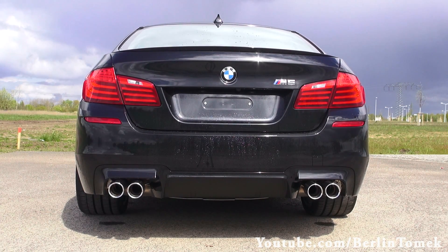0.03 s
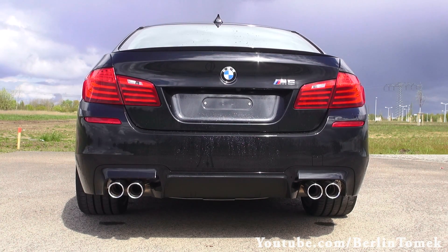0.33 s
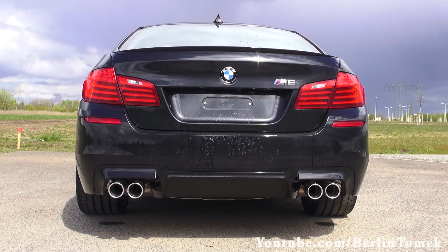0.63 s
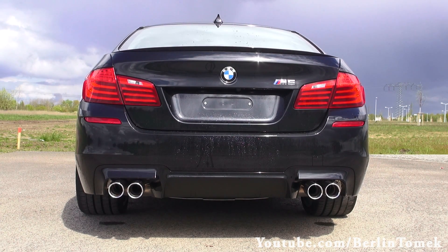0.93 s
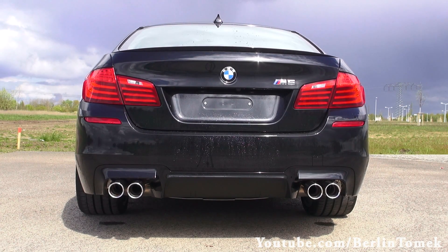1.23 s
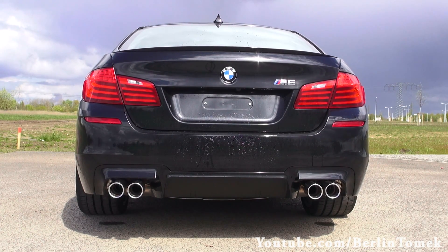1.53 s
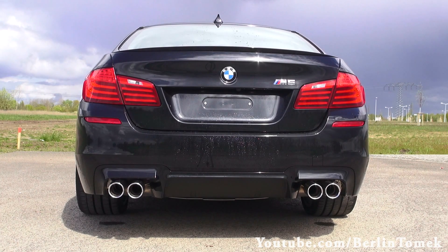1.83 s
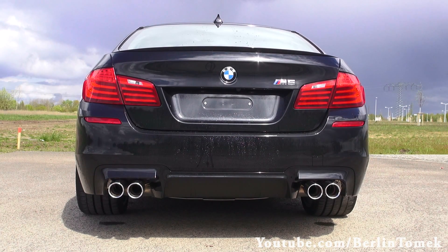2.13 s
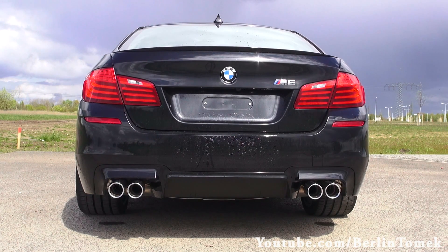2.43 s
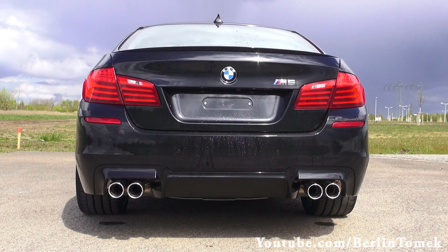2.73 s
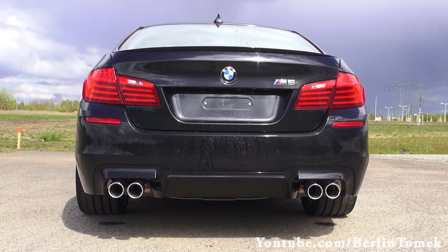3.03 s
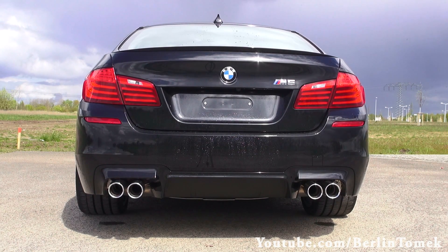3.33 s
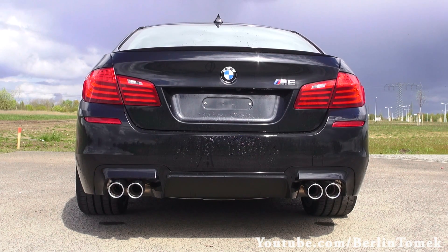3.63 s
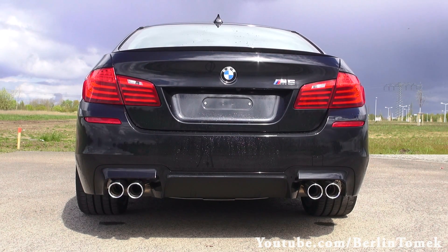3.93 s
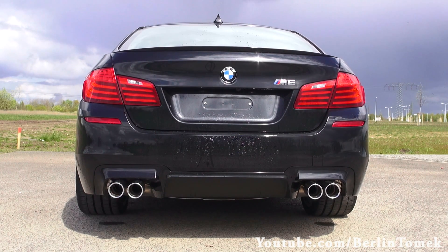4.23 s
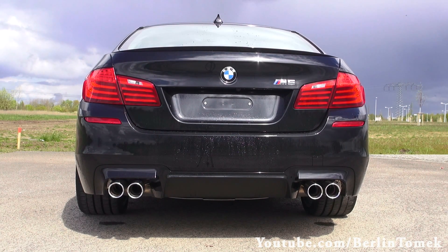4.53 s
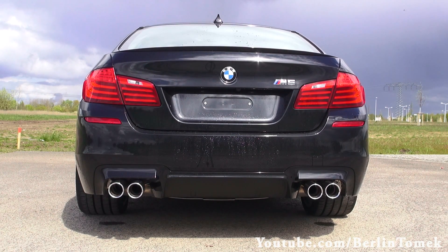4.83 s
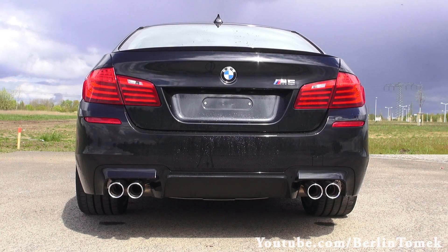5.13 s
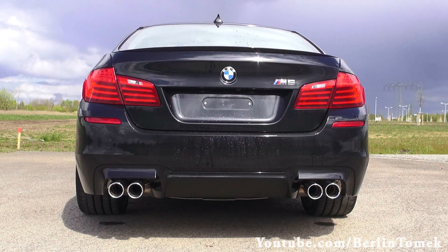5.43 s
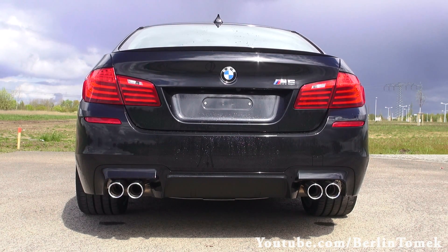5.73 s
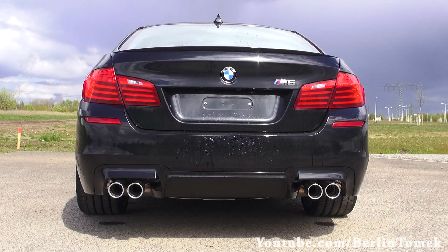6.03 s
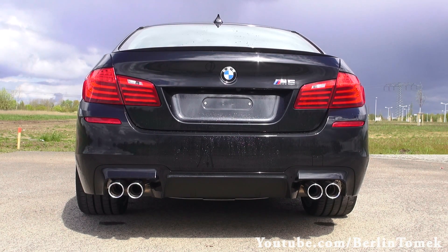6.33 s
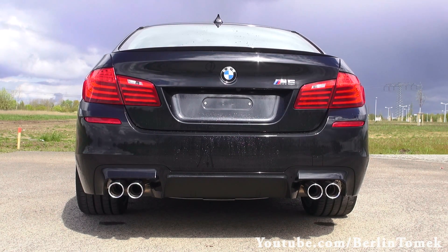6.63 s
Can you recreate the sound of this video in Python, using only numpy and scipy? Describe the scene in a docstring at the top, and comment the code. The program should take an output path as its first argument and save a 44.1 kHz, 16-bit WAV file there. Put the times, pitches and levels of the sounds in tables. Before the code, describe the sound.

A powerful car engine is revved while standing in an open car park, heard close behind the tailpipes and just left of centre. It barks up immediately, sinks, then is blipped again at about 0.9, 1.4, 2.2, 3.0 and 3.5 seconds, the last with a small extra tap. Each blip starts with a low thud and leaps in pitch, then falls with a smooth exhaust boom and a rush of gas; the later four rev highest. From 3.8 seconds the revs run down steadily, chuffing softly and bottoming out around 5 seconds. The engine catches itself and settles into a much quieter, low, lumpy idle that swells gently, with soft injector chatter and a thin high whine. From about 4.8 seconds a small bird sings faint, high trills and slurred whistles overhead, slightly right, growing clearer until the end near 7 seconds.

```python
"""An open car park, the microphone just behind the tailpipes of a standing V8 saloon, blipped six times.
Each blip barks as the firings ring the pipes; then the revs sink with a smooth boom from the exhaust's
resonances and a rush of gas. At last the engine catches itself at a low, lumpy idle with chattering
injectors, and a lark is heard singing overhead, slightly to the right."""
import sys
import numpy as np
from scipy import signal
from scipy.fft import rfft, irfft
from scipy.io import wavfile
from scipy.ndimage import uniform_filter1d, minimum_filter1d

SR = 44100
rng = np.random.default_rng(int(sys.argv[2]) if len(sys.argv) > 2 else 0)


def wav_record(signal):
    """Record a signal, one row per channel, as 16-bit PCM in the file named by sys.argv[1]."""
    frames = np.transpose(np.atleast_2d(signal))
    bounded = np.clip(frames, -1, 1)
    # unit amplitude maps onto the largest positive 16-bit level
    quanta = np.round(bounded * 32767).astype(np.int16)
    wavfile.write(sys.argv[1], SR, quanta)


N = 303408
TIME = np.arange(N) / SR
MID_HZ = 150  # firing rate that the level slopes pivot on
CATCH_S, CATCH_FADE_S = 5.005, 0.25  # the revs bottom out; the idle fades in just ahead of that
SWELL_NOISE_DB, SWELL_BOOM_DB, SWELL_S = 11.5, 8.5, 2.1  # after the catch the level starts this much lower and rises


def undb(db):
    """Decibels to gain."""
    return 10 ** (np.asarray(db) / 20)


def noise():
    """White noise."""
    return rng.standard_normal(N)


def bump(at_s, width_s):
    """A brief rounded swell of height 1."""
    return np.exp(-((TIME - at_s) / width_s) ** 2)


def near(hz, centre_hz, width_hz):
    """1 at the centre frequency, falling smoothly to 0 on either side."""
    return np.exp(-((hz - centre_hz) / width_hz) ** 2)


def smooth(x, seconds):
    """Rounded moving average."""
    size = max(int(seconds * SR), 1)
    return uniform_filter1d(uniform_filter1d(x, size), size)


def steady(x, band_hz=None):
    """Bring the running level of x, or of one band of it, to 1."""
    part = x
    if band_hz is not None:
        part = signal.sosfiltfilt(signal.butter(4, band_hz, "band", fs=SR, output="sos"), x)
    return x / np.sqrt(np.abs(smooth(part ** 2, .06)) + 1e-14)


def ring(x, modes):
    """Resonances (centre_hz, width_hz, level_db) side by side, each applied twice for steep skirts."""
    out = 0
    for k, (hz, width, db) in enumerate(modes):
        b, a = signal.iirpeak(hz, hz / width, fs=SR)
        out = out + (-1) ** k * undb(db) * signal.lfilter(b, a, signal.lfilter(b, a, x))
    return out


def pan(x, left_db):
    """Place a sound between left and right."""
    return x * undb(left_db * np.array([[1], [-1]]) / 2)


def phrase(start, end, period, share, first_hz, middle_hz, last_hz, drift_hz, db):
    """A bird's pure whistle repeats one small curved pitch gesture while it swells and fades."""
    t = np.arange(max(int((end - start) * SR), 200)) / SR
    along = t * SR / len(t)
    note = t / period % 1 / min(share, 1)  # above 1 in the gaps between notes
    gesture = np.polyfit([0, .5, 1], [first_hz, middle_hz, last_hz], 2)
    hz = np.polyval(gesture, np.minimum(note, 1)) + drift_hz * along
    gate = smooth(1. * (note <= 1), 0.00044) * np.abs(np.sin(np.pi * along)) ** 0.17
    tone = undb(db) * np.sqrt(2) * gate * np.sin(2 * np.pi * np.cumsum(smooth(hz, 0.00092)) / SR)
    return np.pad(tone, (int(start * SR), N))[:N]


# Single slurred notes: start_s, end_s, first_hz, middle_hz, last_hz, level_db
LARK_SLURS = [(4.823, 4.857, 5330, 5100, 5130, -48), (5.037, 5.073, 3970, 4296, 4300, -47),
              (5.081, 5.094, 5116, 5200, 5200, -40.5), (5.099, 5.109, 5330, 4500, 3050, -40),
              (5.744, 5.757, 5730, 5210, 5000, -40.5), (6.034, 6.058, 4650, 4850, 4240, -39),
              (6.138, 6.157, 6226, 5860, 5917, -42), (6.158, 6.172, 5630, 4870, 4930, -33.5),
              (6.18, 6.184, 3300, 3880, 4500, -35), (6.189, 6.221, 4540, 4630, 4620, -34),
              (6.784, 6.823, 4500, 4380, 2900, -35)]
# Trills: start_s, end_s, period_s, sounding_share, first_hz, middle_hz, last_hz, drift_hz, level_db
LARK_TRILLS = [ (4.873, 4.990, .0252, .62, 5200, 4970, 5550, 0, -44),
               (5.126, 5.256, 0.013, 0.8, 3620, 3550, 2900, 18, -45),
               (5.338, 5.606, .0277, 1, 4270, 4510, 4140, 0, -41.5),
               (5.67, 5.695, 0.011, 0.49, 5210, 5700, 5500, -2, -46),
               (5.702, 5.725, 0.014, 0.45, 4024, 3646, 3390, -600, -43),
               (5.763, 5.796, .009, 0.8, 5650, 5130, 4430, -800, -42.5),
               (5.868, 5.99, .0245, 0.28, 3400, 4040, 3394, 164, -34.5),
               (6.055, 6.102, 0.0082, 0.64, 5730, 4630, 3400, 900, -40),
               (6.226, 6.26, .0081, .7, 6000, 5100, 5360, 264, -34),
               (6.306, 6.364, .0105, 0.8, 5360, 4700, 4540, -1200, -32.5),
               (6.371, 6.457, .022, 0.22, 2940, 3650, 3012, 0, -33.5),
               (6.508, 6.65, 0.035, 0.29, 4150, 3470, 3107, 552, -36),
               (6.519, 6.639, 0.036, 0.31, 3970, 3740, 3050, 496, -38),
               (6.693, 6.747, .011, .79, 5660, 5270, 5820, 152, -32)]
def lark():
    """Above the car park a lark whistles trills, and slurs that make their gesture only once."""
    slurs = sum(phrase(start, end, end - start, 1, *pitches, 0, db)
                for start, end, *pitches, db in LARK_SLURS)
    return slurs + sum(phrase(*row) for row in LARK_TRILLS)


# Thin whine of the fuel system: centre_hz, width_hz, level_db
FUEL_WHINE = [(8720, 190, -4), (9130, 100, -1)]
def injection(turns):
    """Injectors chatter softly; the fuel system whines, differently in each channel."""
    beat = 1 + 0.23 * np.cos(2 * np.pi * turns / 4)
    chatter = beat * steady(ring(noise(), [(7650, 450, 0.25), (3330, 1900, 1)]))
    whine = np.array([steady(ring(noise(), FUEL_WHINE)) for _ in range(2)])
    return undb(6.0) * chatter + undb(-1.5) * whine


def whistle(turns, hz, throttle):
    """As the revs sink with the throttle shut, each slow chuff of gas whistles faintly."""
    chuffs = noise() * undb(-12 * (turns % 1))
    return undb(-47) * near(hz, 100, 25) * (1 - throttle) * steady(ring(chuffs, [(4600, 380, 0)]))


# Standing waves in the tailpipes: centre_hz, width_hz, lift_db
TAILPIPE_WAVES = [(817, 140, 3.5), (1117, 53, 4), (1287, 36, 6), (1553, 78, 1), (1700, 68, 3.5),
                  (1900, 124, 3), (2520, 110, 0.5), (3310, 310, -4.5), (3790, 100, 2), (4800, 110, 4)]
def tailpipes(x, spectrum):
    """Gas noise takes on the given spectrum and the standing waves of the tailpipes."""
    hz, db = np.transpose(spectrum)
    freqs = np.maximum(np.arange(N // 2 + 1) * SR / N, 1)
    spectrum_db = np.interp(np.log(freqs), np.log(hz), db)
    waves_db = sum(lift * near(freqs, centre, width) for centre, width, lift in TAILPIPE_WAVES)
    bass_rolloff = np.minimum(freqs / hz[0], 1) ** 2
    return irfft(rfft(x) * undb(spectrum_db + waves_db) * bass_rolloff, N)


# Hiss at the tailpipes: frequency_hz, level_db
RUSH_SPECTRUM = [(2000, 11.5), (3200, 7), (3900, 2.5), (4600, 4.5), (5100, -27), (5700, -5.5), (6400, 4.5),
                 (7100, 0), (8000, -10), (9000, -7.5), (10000, -9.5), (11500, -11)]
def rush(turns, pulsing_db):
    """The tailpipes hiss, pulsing with each firing, slightly different in each channel."""
    shared = noise()
    pulse = undb(-pulsing_db * (turns % 1))
    sides = [tailpipes((shared + 0.037 * noise()) * pulse, RUSH_SPECTRUM) for _ in range(2)]
    return np.array([steady(x, band_hz=(6500, 11000)) for x in sides])


# Gas at the tailpipes, throttle open: frequency_hz, level_db
PUFF_SPECTRUM = [(400, -36), (800, 1.5), (1080, -6.5), (1300, -5.5), (1600, 4), (2000, -4), (2600, -6.5),
                 (3300, -16.5), (4200, -23), (5500, -26.5), (7000, -33), (11000, -56)]
# The same, throttle shut: frequency_hz, level_db
FLOW_SPECTRUM = [(300, -3.5), (800, 3.5), (1300, -4.5), (1600, 2.5), (1800, -6), (2000, 1), (2700, -3),
                 (3300, -12), (4500, -12), (5600, -17.5), (11000, -45)]
def gas(turns, throttle, sharp_db, scatter_db, coast_db):
    """Close to the microphone, gas leaves in sharp puffs under load and pulses softly when coasting."""
    size_db = scatter_db * rng.standard_normal(N // 100)[turns.astype(int)]
    age = turns % 1
    puffs = steady(tailpipes(noise() * undb(size_db - sharp_db * age), PUFF_SPECTRUM), (1300, 3000))
    flow = steady(tailpipes(noise() * undb(size_db / 2 - coast_db * age), FLOW_SPECTRUM), (1300, 3000))
    return np.sqrt(throttle) * puffs + np.sqrt(1 - throttle) * flow


# Engine speed: time_s, firing_hz
REVS = [(0,67.6),(.07,112.9),(.11,149.1),(.15,172.1),(.21,176),(.36,159.7),(.61,124.2),(.92,75.8),(.98,114.3),(1.02,143.4),(1.05,155.3),(1.13,157.9),(1.23,147),(1.36,127.9),(1.44,184.5),(1.51,232),(1.56,214.9),(1.68,196.6),(1.82,170.6),(1.97,147.9),(2.19,115.9),(2.25,141.1),(2.33,198.6),(2.38,224.7),(2.43,206.7),(2.64,166.7),(2.81,143.8),(2.97,120.5),(3.05,168.4),(3.14,240.3),(3.16,236.8),(3.21,210.5),(3.47,164.9),(3.61,237.7),(3.69,221),(3.74,226.5),(3.79,215.6),(4.07,176.5),(4.28,144.4),(4.47,115.1),(4.64,89.4),(4.87,58.4),(5.02,50.28),(5.2,56),(5.98,58.04),(6.4,55.65),(6.88,55.2)]
def engine_speed():
    """The firing rate in Hz leaps with each blip, sinks and settles at idle."""
    return smooth(np.interp(TIME, *np.transpose(REVS)), 0.0066)


# Throttle blips: opens_s, shuts_s, boom_db, bark_db, gas_db, thud_db, lull_db, gush_db
BLIPS = [(0, 0.271, -1, 1.1, 0.9, 2.5, -6.5, -2), (0.921, 1.142, 1, 3, 3, 1, -10.5, -4.5),
         (1.37, 1.52, -1.5, 0.5, 0.5, -1, 4, 5.5), (2.2, 2.375, 0.5, 2.2, 1, -1.5, 0.5, 1.5),
         (2.98, 3.159, 0.5, 0.5, 1.5, -3, -0.5, 0.5), (3.491, 3.637, -4, -2, -6, -8, -4, 7),
         (3.665, 3.741, -11, -6.5, -11, -12, -8.5, -.5)]
def pedal(travel_s=0.024, lull_s=0.51, gush_lag_s=0.17):
    """Throttle opening 0-1, then the latest blip's boom, bark, gas, lull and gush offsets in dB."""
    rows = np.array(BLIPS)
    latest = np.maximum(np.searchsorted(rows[:, 0], TIME, side="right") - 1, 0)
    _, shuts, boom_db, bark_db, gas_db, _, lull_db, gush_db = rows[latest].T
    lull_db = lull_db * np.exp(-np.maximum(TIME - shuts, 0) / lull_s)  # fades as the engine coasts
    gush_db = gush_db * bump(shuts + gush_lag_s, 0.19)  # trapped air gushes out after shutting
    throttle = np.clip(smooth(1. * (TIME < shuts), travel_s), 0, 1)
    return [throttle] + [smooth(db, travel_s) for db in (boom_db, bark_db, gas_db, lull_db, gush_db)]


def cuts():
    """Rises to 1 just after each shutting of the throttle, where boom, gas and hiss dip."""
    return sum(bump(shuts + 0.024, width_s=0.037) for _, shuts, *_ in BLIPS)


def idle_lack():
    """Falls from 1 to 0 as the level after the catch rises."""
    return np.clip(1 - (TIME - CATCH_S) / SWELL_S, 0, 1)


def lope(turns, idle):
    """The idle throbs once in every eight firings: its swing in dB."""
    return 0.5 * idle * np.cos(2 * np.pi * turns / 8)


def blend(shut_db, open_db, idle_db, throttle, idle):
    """Pass between the levels of coasting, pulling and idling."""
    return (1 - idle) * ((1 - throttle) * shut_db + throttle * open_db) + idle * idle_db


# Levels about MID_HZ: coast_db, coast_db_per_octave, load_db, load_db_per_octave, idle_db
BARK_LAW = (-33, 5, -22, 11, -42.5)
GAS_LAW = (-35.5, 4, -26.5, 9, -40.5)
HISS_LAW = (-52.5, 3.5, -50.5, -2.5, -54.5)
def loudness(law, hz, throttle, idle, shut_db, open_db):
    """Level of a noisy part in dB: it follows speed by one slope when coasting, another under load."""
    coast_db, coast_slope, load_db, load_slope, idle_db = law
    octaves = np.log2(hz / MID_HZ)
    coasting = coast_db + coast_slope * octaves + shut_db
    pulling = load_db + load_slope * octaves + open_db
    idling = idle_db - SWELL_NOISE_DB * idle_lack()
    sink_db = -2 * bump(CATCH_S - 0.55, width_s=0.81)  # the noise sags ahead of the lowest revs
    return blend(coasting, pulling, idling, throttle, idle) + sink_db


def firings(turns, scatter, lumpy):
    """One kick per firing: how much it departs from the mean, by cylinder and by chance."""
    at = np.flatnonzero(np.diff(np.floor(turns)))
    cylinders = np.array([1, -1, 1, 1, -1, 1, -1, -1])  # the two banks fire unevenly
    chance = rng.standard_normal(N // 100)[:len(at)]
    kicks = np.zeros(N)
    kicks[at] = scatter * chance + lumpy * cylinders[np.arange(len(at)) % 8]
    return kicks


# Resonances of the silencer: centre_hz, width_hz, level_db
SILENCER_MODES = [(72, 41, -11.5), (87, 12, -6.5), (107.3, 35, -3), (138.5, 92, -5.5)]
def burble(turns, hz, bark_db, throttle, idle, thud_s=0.031, lag_s=0.008):
    """Uneven firings rumble in the silencer, more at high revs, and thud whenever the throttle moves."""
    rumble_db = -28.5 + 0.51 * (bark_db + 36) + 2.2 * throttle - 0.84 * idle
    rumble_db += 1.886 * np.log2(hz / MID_HZ)
    thuds = undb(-37) * bump(5.09, thud_s)  # the first firm firing of the idle
    for opens, shuts, _, _, _, thud_db, *_ in BLIPS:
        thuds += undb(thud_db - 17.5) * bump(opens + lag_s, thud_s)
        thuds += undb(thud_db - 22) * bump(shuts + lag_s, thud_s)
    rumble = steady(ring(firings(turns, scatter=0.88, lumpy=0.51), SILENCER_MODES))
    thump = steady(ring(firings(turns, scatter=1, lumpy=0.13), [(68.5, 67, 0)]))
    return undb(rumble_db) * rumble + thuds * thump


# The exhaust's answer to speed: firing_hz, line_shut_db, line_open_db, octave_shut_db, octave_open_db
EXHAUST_RESPONSE = [(58.7, -19, -34, -19.5, -21), (80, -19.5, -13.5, -37.5, -16),
                    (108, -16, -11, -27, -17.5), (117.98, -10.5, -9, -20.5, -26),
                    (129.93, -9, -4.5, -25, -10.5), (145.82, -9.5, -2.5, -38.5, -32),
                    (169, -20.5, -10, -50, -6), (174, -17.5, -11.5, -27, -18),
                    (194.4, -17, -4.5, -19.5, -13), (206.5, -16, -4, -29, -7), (238, -34, -3.5, -30, -1.5)]
def boom(turns, hz, throttle, idle, push_db, lull_db):
    """The firing line and its octave swell and sink as the revs sweep the exhaust's resonances."""
    rates, *columns = np.transpose(EXHAUST_RESPONSE)
    line_shut, line_open, octave_shut, octave_open = (np.interp(hz, rates, c) for c in columns)
    lack_db = SWELL_BOOM_DB * idle_lack() ** 2
    line_db = blend(line_shut + lull_db, line_open + push_db, -25.5 - lack_db, throttle, idle)
    octave_db = blend(octave_shut + lull_db, octave_open + 0.75 * push_db, -28.5 - 0.94 * lack_db,
                      throttle, idle)
    line = undb(line_db) * np.cos(2 * np.pi * turns)
    octave = undb(octave_db + lope(turns, idle)) * np.cos(4 * np.pi * turns)
    stall_db = -20 * bump(CATCH_S, width_s=0.051)  # the boom all but stops at the lowest revs
    return -np.sqrt(2) * undb(stall_db - 2 * cuts()) * (line + octave)


# Resonances of the exhaust when revving: centre_hz, width_hz, level_db
BARK_MODES = [(228.7, 82, 0.5), (353, 79, -2), (404, 55, 2), (475, 70, 0.8), (602.4, 73, -6),
              (688.4, 39, -14), (805, 146, -13), (1060, 270, -26.5)]
# The same at idle: centre_hz, width_hz, level_db
PUTTER_MODES = [(79.5, 31.1, 16), (133, 74, 8), (226, 44.4, 6.5), (283, 37, 2.5), (341.1, 33, 6.5),
                (411, 39, 5.5), (451, 54, 1), (568, 89, -5), (657, 112, -12.5), (830.2, 95, -20)]
def bark(turns, hz, throttle, idle):
    """Firings ring the pipes with overtones, uneven kicks and turbulence; at idle they only putter."""
    overtones = sum(np.cos(2 * np.pi * k * turns) for k in range(3, 15)) * 2 * hz / SR
    swirl = noise() * np.sqrt(hz / SR)
    revving = (.5 + .5 * throttle) * overtones + firings(turns, scatter=0.47, lumpy=0.45) + 0.67 * swirl
    idling = 0.51 * overtones + firings(turns, scatter=0.47, lumpy=0.12) + 0.99 * swirl
    pipes = steady(ring(revving, BARK_MODES), band_hz=(490, 1000))
    putter = steady(ring(idling, PUTTER_MODES), band_hz=(490, 1000))
    return np.sqrt(1 - idle) * pipes + np.sqrt(idle) * undb(-4.5) * putter


def scene():
    """Speed and throttle drive the exhaust, close up and just left of centre; the lark is to the right."""
    hz = engine_speed()
    turns = np.cumsum(hz) / SR  # firings so far
    throttle, boom_push, bark_push, gas_push, lull_db, gush_db = pedal()
    idle = np.clip((TIME - CATCH_S) / CATCH_FADE_S + 1, 0, 1)
    slow = near(hz, 104, 23)  # slow coasting strokes blow harder
    chuff = near(hz, 70, 40) * (1 - idle)  # at the foot of a run-down the strokes stand apart
    bark_db = loudness(BARK_LAW, hz, throttle, idle, 0.77 * lull_db, bark_push)
    gas_shut_db = 0.5 * lull_db + 0.17 * gush_db + 0.6 * slow
    gas_db = loudness(GAS_LAW, hz, throttle, idle, gas_shut_db, gas_push) - 4 * cuts()
    hiss_db = loudness(HISS_LAW, hz, throttle, idle, gush_db + 4.5 * slow, 0) - 5 * cuts()
    hiss_db += 0.73 * lope(turns, idle)
    low = boom(turns, hz, throttle, idle, boom_push, lull_db) + burble(turns, hz, bark_db, throttle, idle)
    pipes = undb(bark_db) * bark(turns, hz, throttle, idle)
    puffs = undb(gas_db) * gas(turns, throttle, sharp_db=11.5, scatter_db=3, coast_db=5 + 6.8 * chuff)
    hiss = undb(hiss_db) * (rush(turns, pulsing_db=4 + 5.8 * chuff) + idle * injection(turns))
    car = pan(low, 1.5 - .5 * idle) + pan(pipes, 1) + pan(puffs, 0.3) + hiss
    return car + whistle(turns, hz, throttle) + pan(lark(), -3)


def record(dry):
    """The microphone loses the deepest bass, a fast gain control ducks loud moments, the top is cut."""
    bottom_hz, top_hz, ceiling, hold_s = 24, 11800, 0.64, 0.025
    thin = signal.sosfilt(signal.butter(2, bottom_hz, "high", fs=SR, output="sos"), dry)
    allowed = 1 / np.hypot(1, np.abs(thin).max(axis=0) / ceiling)
    held = minimum_filter1d(allowed, size=int(hold_s * SR))
    limited = thin * smooth(held, .008)
    return signal.sosfilt(signal.ellip(10, .2, 80, top_hz, fs=SR, output="sos"), limited)


dry = scene()
out = record(dry)
wav_record(out)
```